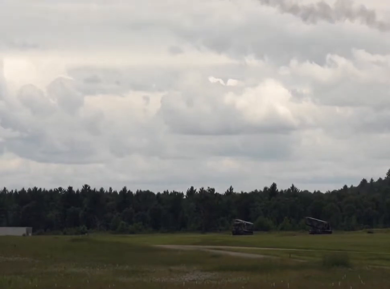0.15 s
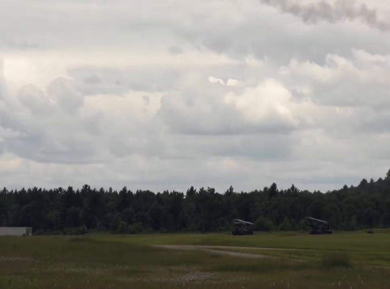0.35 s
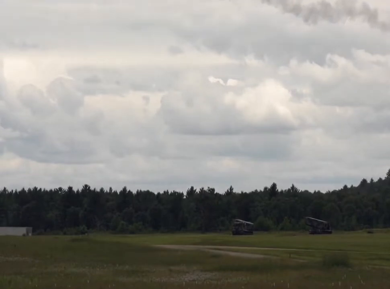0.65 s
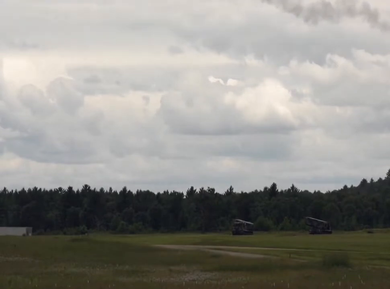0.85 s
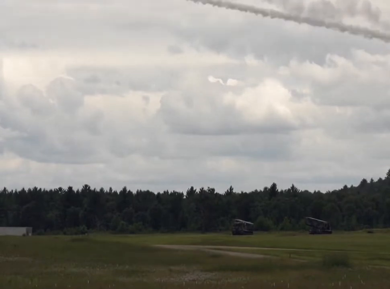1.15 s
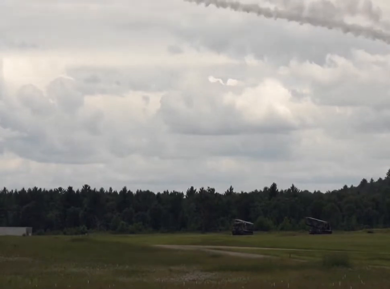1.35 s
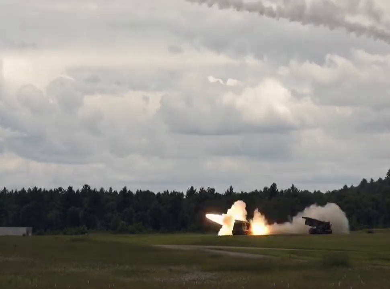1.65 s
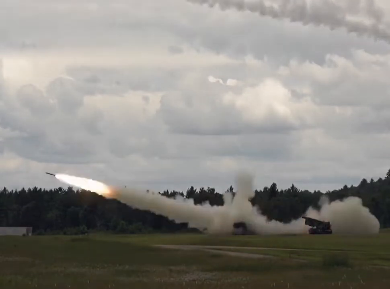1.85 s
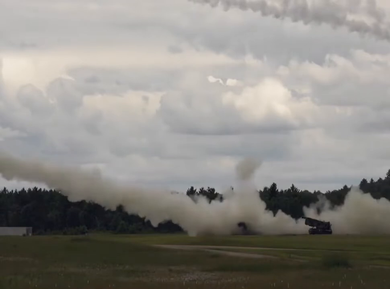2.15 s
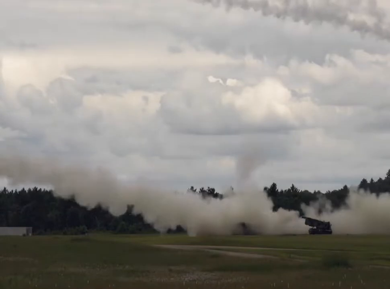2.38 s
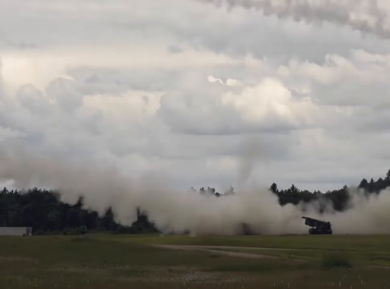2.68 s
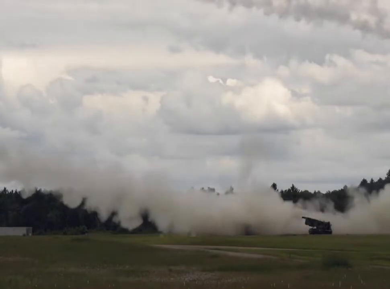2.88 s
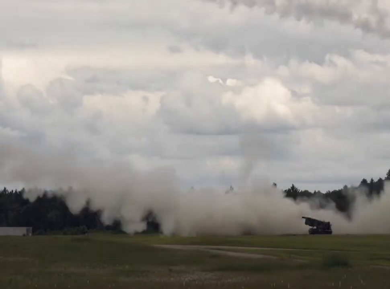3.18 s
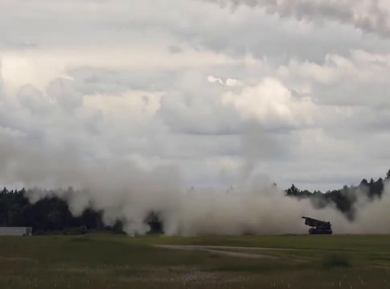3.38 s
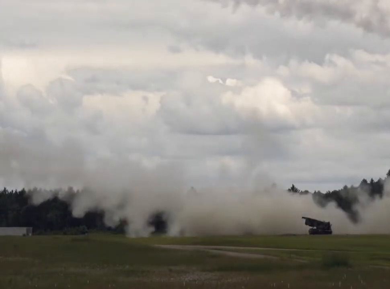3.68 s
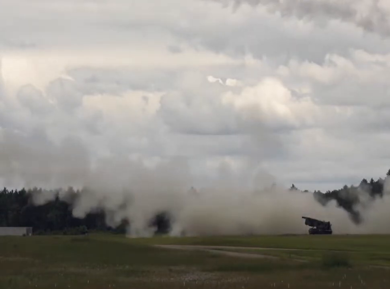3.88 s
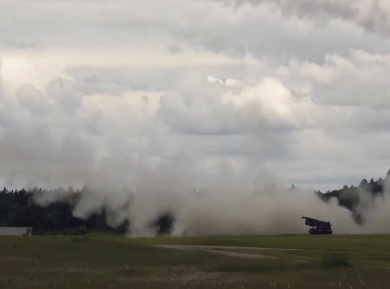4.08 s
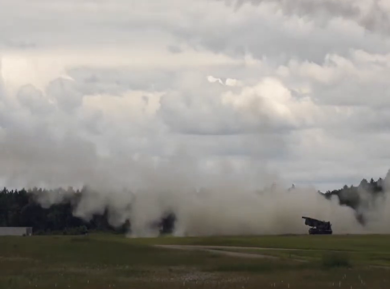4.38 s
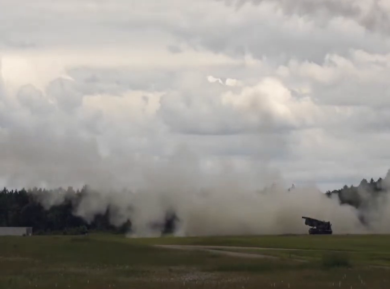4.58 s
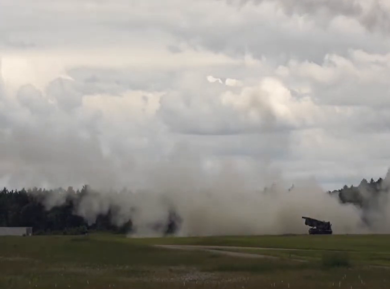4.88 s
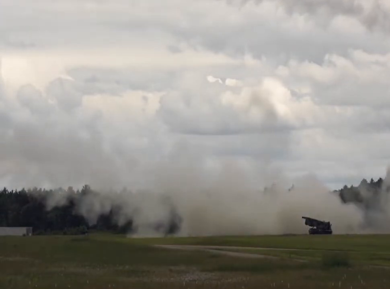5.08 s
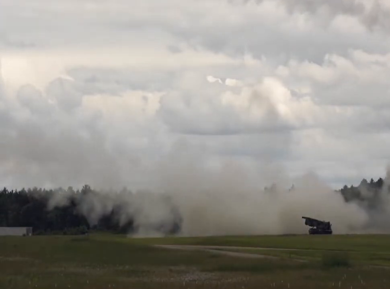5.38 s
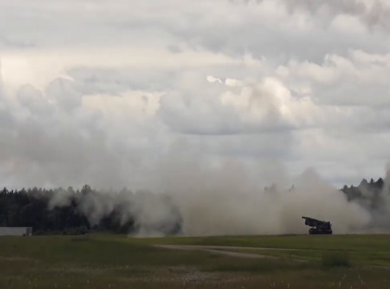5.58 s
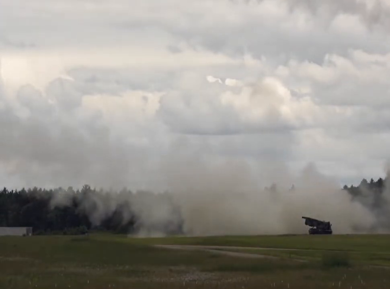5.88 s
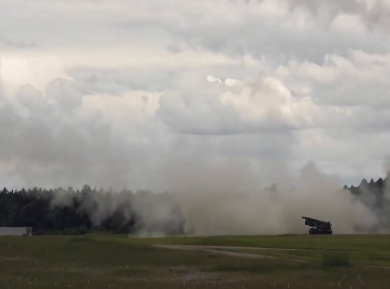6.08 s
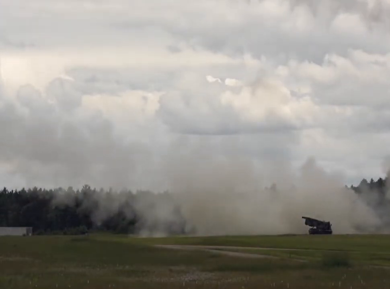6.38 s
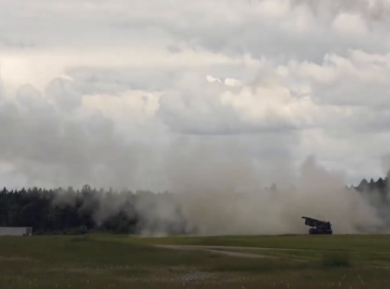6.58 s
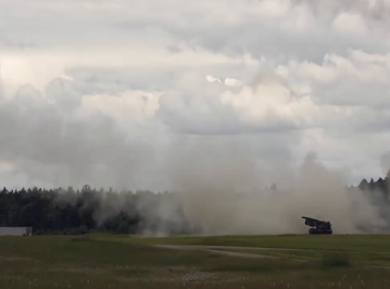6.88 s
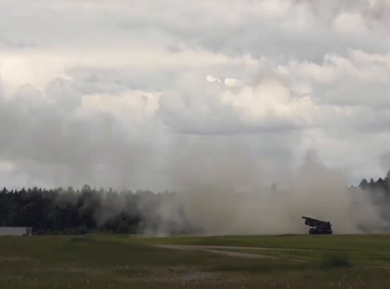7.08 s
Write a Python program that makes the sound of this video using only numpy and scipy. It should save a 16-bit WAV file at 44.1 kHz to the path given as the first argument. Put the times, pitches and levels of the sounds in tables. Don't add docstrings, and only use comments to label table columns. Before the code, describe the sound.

Distant outdoor perspective over soft open ground, jets centred and almost mono. From 0 s a rocket is already receding: a low boom at the very start, then a turbulent mid-low roar, fluttering, treble dulled by air, with isolated snaps near 0.6, 0.9 and 1.3 s. Its pitch sinks and it sputters out around 1.5-1.7 s, leaving quiet deep rumble and uneven echo, with a small swell near 2.3 s. At 2.97 s a very sudden, loud ignition blast hits, a short ringing crack with a ground thump, straight into a brighter, ripping roar. Dense sharp crackles and low booms fill 3.0-3.6 s; then the roar darkens, weakens and breaks into ragged puffs until burn-out around 5.1 s. Dull echoes roll back from the trees, clearest near 5.7 s, with softer returns from 6.2 to 6.6 s, fading over faint hiss and light wind to about 7.2 s.

```python
import sys
import numpy as np
from scipy import signal
from scipy.fft import rfft, irfft, next_fast_len
from scipy.io import wavfile
from scipy.ndimage import uniform_filter1d, map_coordinates

SR = 44100
rng = np.random.default_rng(int(sys.argv[2]) if len(sys.argv) > 2 else 0)


def how_loud(loudness_db):
    steps = np.asarray(loudness_db, float) / 20
    return 10 ** steps


def to_wav(s):
    ch = np.atleast_2d(s).T
    pcm = np.round(np.clip(ch, -1, 1) * 32767)
    wavfile.write(sys.argv[1], SR, pcm.astype(np.int16))


N = 319195
TIME_S = np.arange(N) / SR


def unit(x):
    return x / np.sqrt(np.mean(x ** 2) + 1e-20)


def along(points, hz):
    point_hz, value = np.transpose(points)
    return np.interp(np.log(hz + 1), np.log(point_hz + 1), value)


def curves(table):
    s, *cols = np.transpose(table)
    return np.array([np.interp(TIME_S, s, c) for c in cols])


def bumps(rows):
    rise, edge = 0.86, 1.73
    s, length, *cols = np.transpose(rows)
    t = np.arange(0, N / SR + .002, .001)
    u = 2 * (t - s[:, None]) / length[:, None]
    flank = np.where(u < 0, rise, 2 - rise)
    bells = np.exp2(-np.abs(u / flank) ** edge)
    return np.array([np.interp(TIME_S, t, c @ bells) for c in cols])


def wobble(rate):
    knots = rng.standard_normal(int(N * 200 / SR))
    return map_coordinates(knots, [TIME_S * min(rate, 190)])


def coloured(x, spectrum):
    m = next_fast_len(N + 8192)
    hz = np.fft.rfftfreq(m, 1 / SR)
    closed = [(1, -90)] + list(spectrum) + [(SR / 2, spectrum[-1][1] - 30)]
    cepstrum = irfft(np.log(how_loud(along(closed, hz))), m)
    cepstrum[1:m // 2] *= 2
    cepstrum[m // 2 + 1:] = 0
    return irfft(rfft(x, m) * np.exp(rfft(cepstrum)), m)[..., :N]


def rush(spectrum, patchy_db):
    z = signal.stft(rng.standard_normal(N), nperseg=512)[2]
    field = uniform_filter1d(rng.standard_normal(z.shape), size=5, axis=0)
    field = uniform_filter1d(field, size=8, axis=1)
    noise = signal.istft(z * how_loud(patchy_db * unit(field)), nperseg=512)[1][:N]
    return unit(coloured(noise, spectrum))


def by_rocket(first, second):
    return np.where(TIME_S < 2.9688, first, second)


# start_s, roar_level_db, sunk (0-1, how far the roar has dropped
FLIGHTS = [
    [(0, -16.5, 0.17, 0.72, 0.4), (.45, -16, 0.31, .85, 0.04), (.72, -16.5, 0.37, 0.79, 0.54),
     (1.1, -17, 0.77, 0.87, 0.34), (1.57, -22, 0.99, 0.83, 0.85), (1.67, -29.5, 0.9, 1.1, 1),
     (1.85, -35, 0.6, 1.06, 0.4), (2.5, -36.5, 0.87, 1.2, 0.6), (2.9, -39, 0.72, 7.5, 0.2)],
    [(2.97, -17.5, 0, 0.12, 0.63), (3.45, -19.5, 0.54, 0.075, 0.65), (3.75, -23, 0.58, 0.38, 0.88),
     (4.95, -24.5, 1, 0.96, 0.52), (5.18, -34, 0.61, 0.9, 0.7), (5.55, -33, 0.73, 1.28, 0.8),
     (5.95, -38.5, 0.67, 1.2, 1), (6.55, -36, 0.97, 1.5, 0.4), (7.24, -38.5, 0.73, 3.1, 0)],
]
# upper_roar_db, shock_fronts_db, rumble_db, ground_dip_db
VOICES = [
    (-4.5, -11, -9.5, -17),
    (-6, -7.5, -4, -15),
]
# start_s, length_s, roar_db, treble_db
GUSTS_FIRST = [(.49, 0.034, 1, 3), (.715, 0.031, 6.5, 1), (.795, 0.031, -6.5, 2), (.85, 0.018, 4.5, 8),
               (.89, 0.026, -0.5, 3), (.93, 0.032, 3.5, -3), (1.07, 0.05, 3, 10), (1.11, 0.016, 4.5, 5.5),
               (1.22, 0.023, 0.5, 7), (1.265, 0.023, -2.5, 3), (1.318, 0.049, 6, 4),
               (1.325, 0.035, -0.5, 10), (1.375, 0.022, -5, 7), (1.415, 0.031, 6.5, 7),
               (1.45, 0.016, 4.5, 9), (1.5, 0.027, -8, 3), (1.545, 0.056, 9, -22), (1.615, 0.03, 2.5, 10.5)]
# start_s, length_s, roar_db, treble_db
GUSTS_SECOND = [(2.97, 0.023, 0, 7.5), (3.135, .03, -1, 2), (3.17, 0.017, 1.5, 2), (3.22, 0.12, 0, -4.5),
                (3.27, 0.04, 2, -0.5), (3.35, 0.057, 0.5, 4), (3.42, 0.072, 5.5, -0.5),
                (3.52, 0.074, 3.5, 2), (3.605, 0.042, 6.5, 3), (3.7, 0.061, 2.5, 1), (3.8, .05, 3, 1.5),
                (3.885, 0.096, 8.5, 8.5), (4.0, 0.047, 7, 3.5), (4.125, .04, -2.5, 3.5),
                (4.247, 0.047, 3.5, 7.5), (4.29, 0.022, 3, 2), (4.43, 0.041, 5.5, 6.5),
                (4.475, 0.024, -1, -1), (4.53, 0.036, 1.5, 7.5), (4.565, 0.025, 9, 2), (4.607, 0.015, 5, 3),
                (4.665, 0.084, 6.5, 7), (4.8, 0.053, -3, 1.5), (4.825, 0.0096, 9, -3),
                (4.872, 0.052, 10, 8.5), (4.98, 0.083, 7.5, 6.5), (5.12, 0.036, 4.5, 4),
                (5.22, 0.045, 1.5, 5)]
# start_s, length_s, roar_db, treble_db
TREE_RETURNS = [(1.72, .03, 4, 5.5), (2.21, 0.044, 6, 6.4), (2.39, 0.039, 4.8, 1), (2.597, .02, 3, 1),
                (2.685, 0.027, 5.6, 1), (5.27, 0.046, 1.9, 4), (5.68, .06, 11.9, 11), (5.45, .1, 0.5, 3.5),
                (5.76, .07, 4.9, 5), (5.85, .05, 0, 4), (6.3, 0.034, 1, 4), (6.5, 0.29, 6.2, 1),
                (6.57, 0.031, 3, 3), (6.79, .05, -3.5, 2)]
# start_s, length_s, rumble_db, ground_dip_db
BILLOWS = [(.12, 0.057, -3, -9), (.4, .1, 3, 2), (.64, 0.054, 5.5, 3), (.97, 0.11, -15, 0.5),
           (1.17, 0.069, 0, 15.5), (1.44, .08, 9, 2), (2.3, 0.13, 8.5, 8), (2.72, 0.28, 6.5, 3.5),
           (3.1, 0.026, 9, 5), (3.24, 0.064, 1, -2), (3.6, 0.15, -0.5, 9), (3.9, .08, -11, 10.5),
           (4.14, 0.089, 2, 9), (4.32, 0.075, -7, -3.5), (4.65, 0.28, 7, -2.5), (4.81, 0.03, -5, 6),
           (5.05, 0.29, 6, 4), (5.7, .15, -1, 4.5), (6.2, 0.22, -4, -1), (6.52, 0.23, -12, 5),
           (6.85, .08, 5, -2)]


def levels():
    roar, sunk, lost, _ = by_rocket(*map(curves, FLIGHTS))
    upper, front, rumble, dip = roar + by_rocket(*np.array(VOICES)[:, :, None])
    gust, spark = by_rocket(bumps(GUSTS_FIRST), bumps(GUSTS_SECOND)) + bumps(TREE_RETURNS)
    deep, fill = bumps(BILLOWS)
    upper = upper - 3.5 * sunk - 0.5 * lost + 0.52 * gust + 0.1 * spark
    front = front - 13 * lost + spark
    rumble = rumble - 9.5 * sunk + 0.07 * gust + deep
    dip = dip + 7.5 * sunk + 0.13 * gust + fill
    return roar + gust, upper, front, rumble, dip


# freq_hz, density_db (per Hz)
NEAR_ROAR = [(300, -38), (420, -14), (550, -1.5), (750, -0.5), (950, -3), (1200, -8.5), (1700, -40)]
# freq_hz, density_db (per Hz)
SUNK_ROAR = [(230, -31), (340, -6), (450, -3), (600, -1.5), (780, -5.5), (950, -21.5), (1400, -36)]
# freq_hz, density_db (per Hz)
UPPER_ROAR = [(750, -31), (1100, 0.5), (1400, -2), (2000, -10), (2800, -15), (4000, -29), (6000, -50.5)]
# freq_hz, density_db (per Hz)
SHOCK_FRONTS = [(1200, -2.5), (2500, 2), (4000, -0.5), (6000, 4), (8000, -4), (10300, -15), (12000, -18.5),
                (15500, -16)]


def jets():
    roar_db, upper_db, front_db = levels()[:3]
    sunk, lost, steep = np.clip(by_rocket(*map(curves, FLIGHTS))[1:], 0, 1)
    flicker = steep * wobble(45)
    near = np.sqrt(1 - sunk) * rush(NEAR_ROAR, patchy_db=1.6)
    roar = near + np.sqrt(sunk) * rush(SUNK_ROAR, patchy_db=1.8)
    upper = rush(UPPER_ROAR, patchy_db=1.5)
    body = how_loud(roar_db + .9 * flicker) * roar + how_loud(upper_db + 1.8 * flicker) * upper

    wave = roar + 0.54 * upper
    is_peak = np.diff(np.sign(np.diff(wave, prepend=0, append=0))) < 0
    crest = is_peak * np.clip(wave, 0, None)
    sizes = how_loud(3.4 * rng.exponential(size=N) + 5.6 * wobble(45) + 0.72 * flicker)
    fronts = unit(coloured(np.minimum(crest ** 2.9 * sizes, 9), SHOCK_FRONTS))
    treble = np.sqrt(steep) * fronts + np.sqrt(1 - steep) * rush(SHOCK_FRONTS, patchy_db=1.8)
    dulled = coloured(treble, [(500, 11), (3500, 3.0), (7000, -6), (15500, -7.0)])
    return body + how_loud(front_db) * ((1 - lost) * treble + lost * dulled)


# start_s, peak_db, swing_hz, t60_s
BLAST = [
    (2.9677, 4, 1000, .005),
    (2.9678, -11, 6000, .012),
    (2.9693, -1, 800, .005),
    (2.9707, 0, 730, .028),
    (2.9762, -7, 112, .1),
    (2.9797, -4, 780, .012),
    (2.9908, -7, 900, .012),
]


def blast():
    out, t = np.zeros(N + SR), np.arange(SR // 4) / SR
    for s, db, hz, t60 in BLAST:
        out[round(s * SR):][:len(t)] += how_loud(db - 60 * t / t60) * np.sin(2 * np.pi * hz * t)
    return out[:N]


# start_s, peak_db
CRACKS = [(0.5879, -23), (0.9251, -17.5), (1.0523, -25), (1.2179, -29), (1.3042, -34), (1.3212, -13),
          (1.6105, -44), (3.127, -11), (3.1654, -10), (3.2078, -23), (3.3211, -15), (3.345, -8),
          (3.4717, -18), (3.495, -10), (3.5989, -25), (3.6364, -16), (3.7032, -26), (3.7935, -27),
          (3.8757, -14), (3.9117, -10), (3.9954, -12), (4.0604, -25), (4.1272, -19), (4.2425, -30),
          (4.2502, -12), (4.4326, -27), (4.5243, -27), (4.5278, -23), (4.665, -23), (4.671, -20.5)]
# freq_hz, density_db (per Hz)
SNAP = [(800, -14), (2500, -35), (5000, 5.5), (8000, -2), (11000, -21), (15500, -12)]


def cracks():
    hits, t = np.zeros(N + SR), np.arange(SR // 50) / SR
    for s, db in CRACKS:
        spray = 0.13 * how_loud(-60 * t / 0.015) * rng.standard_normal(len(t))
        spray[0] = 1
        hits[round(s * SR):][:len(t)] += how_loud(db + 10) * spray
    return coloured(hits[:N], SNAP)


# start_s, peak_db, pitch_hz
THUMPS = [
    (0.019, -13.5, 105.4),
    (3.04, -19, 99.5),
    (3.078, -23, 121.5),
    (3.086, -28, 228),
    (3.155, -26, 121),
    (3.195, -16.5, 104.5),
    (3.225, -20, 121.7),
    (3.334, -19.5, 125),
    (3.445, -24, 106),
    (3.559, -20, 107),
]


def thumps():
    out, t = np.zeros(N + SR), np.arange(SR // 4) / SR
    for s, db, hz in THUMPS:
        swell = t / 0.019 * np.exp(1 - t / 0.021)
        out[round(s * SR):][:len(t)] += how_loud(db) * swell * np.sin(2 * np.pi * hz * t)
    return out[:N]


# freq_hz, density_db
RUMBLE = [(25, -26), (50, -26), (80, -8), (110, -6.5), (140, -1.5), (190, -10), (300, -59.5)]
# freq_hz, density_db (per Hz)
GROUND_DIP = [(140, -27.5), (200, 2.5), (260, -4.5), (320, -3), (420, -37.5)]


def lows():
    rumble_db, dip_db = levels()[3:]
    rumble = np.hypot(how_loud(rumble_db), how_loud(-49.5))
    return rumble * rush(RUMBLE, patchy_db=2.5) + how_loud(dip_db) * rush(GROUND_DIP, patchy_db=2.5)


# start_s, length_s, peak_db
SWELLS = [
    (2.265, 0.28, -41),
    (5.68, .2, -37.5),
    (6.22, 0.15, -38.5),
    (6.396, 0.089, -38),
    (6.56, 0.081, -46),
]
# freq_hz, density_db (per Hz)
ECHO_BAND = [(900, -39), (1150, -3.5), (1450, 2.5), (1650, -17), (2200, -29), (4000, -66.5)]


def swells():
    level = bumps([(s, length, how_loud(db)) for s, length, db in SWELLS])[0]
    return level * rush(ECHO_BAND, patchy_db=2)


# freq_hz, density_db (per Hz)
HISS = [(4000, -14), (4850, -25), (5200, -41), (5500, 9.5), (6600, 1.5), (8000, -4), (8900, 0.5),
        (9600, -5), (10000, -18), (10750, -25), (10950, -4.5), (12500, -6), (14000, -5), (15600, -11)]


def hiss(roar):
    return (how_loud(-74) + how_loud(-28.5) * roar ** 1.22) * rush(HISS, patchy_db=0.6)


# freq_hz, side_over_mid_db
PORTS_APART = [(60, -52), (200, -50), (500, -52), (1200, -36), (2200, -24), (3500, -27), (6000, -27),
               (15000, -27)]
# freq_hz, density_db
BREEZE = [(25, -12), (60, 0), (150, 0), (230, -8), (300, -40)]


def width(mid, roar):
    calm = np.clip(how_loud(-36) / roar, 0, 1)
    hz, _, z = signal.stft(mid * calm ** .45, SR, nperseg=256)
    scattered = z * how_loud(along(PORTS_APART, hz))[:, None] * np.exp(2j * np.pi * rng.random(z.shape))
    echo = signal.istft(scattered, SR, nperseg=256)[1][:N]
    return echo + how_loud(-66) * calm ** 3 * rush(BREEZE, patchy_db=3)


def scene():
    roar = how_loud(levels()[0])
    mid = jets() + blast() + cracks() + thumps() + lows() + swells() + hiss(roar)
    side = width(mid, roar)
    return np.array([mid + side, mid - side])


def top_cut(x):
    return signal.sosfilt(signal.butter(12, 16440, fs=SR, output="sos"), x)


# freq_hz, gain_db
HOUSING = [(20, -7), (45, 5), (80, -0.5), (4300, 0.5), (5100, -3.5), (5700, -6), (9000, -3.5), (10400, -2),
           (11200, -1.5), (15700, -6)]


def record(dry):
    x = coloured(dry, HOUSING)
    x = x / (1 + np.abs(x / 1.1) ** 8) ** (1 / 8)
    below_top = np.fft.rfftfreq(N, 1 / SR) < 15750
    x = irfft(rfft(x) * below_top, N)
    return top_cut(x)


dry = scene()
out = record(dry)
to_wav(out)
```